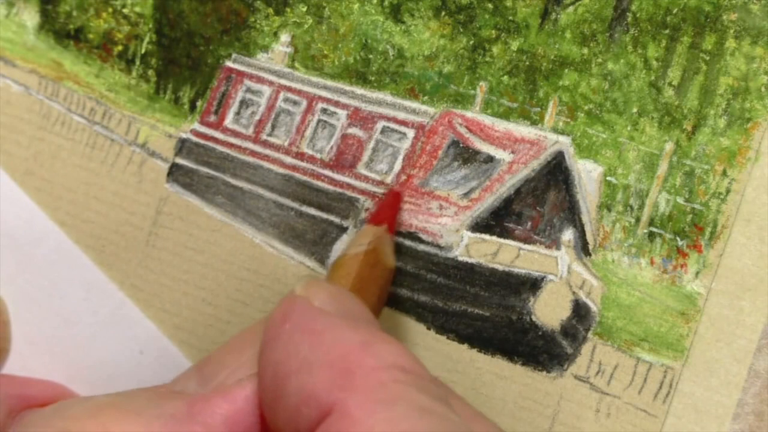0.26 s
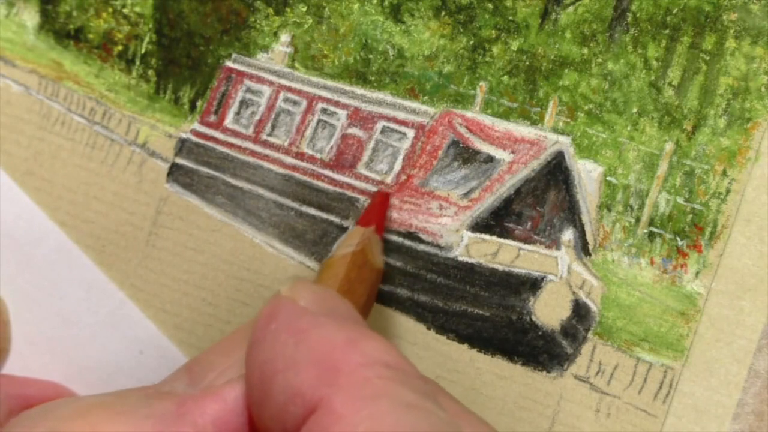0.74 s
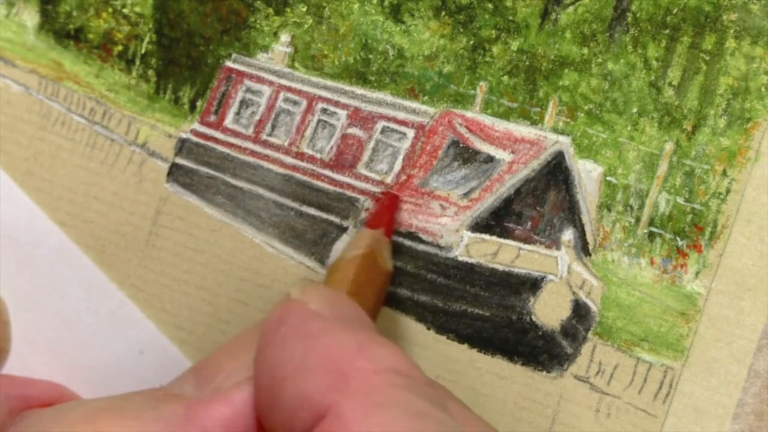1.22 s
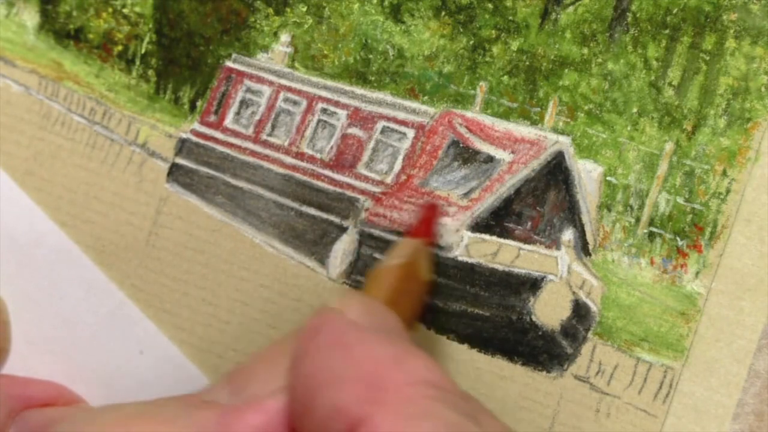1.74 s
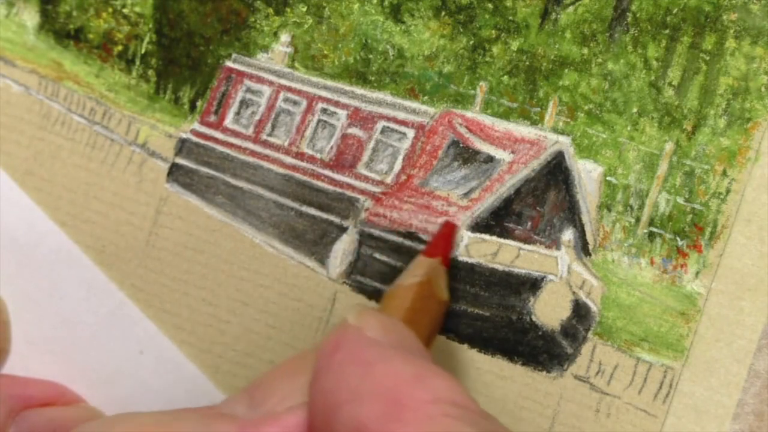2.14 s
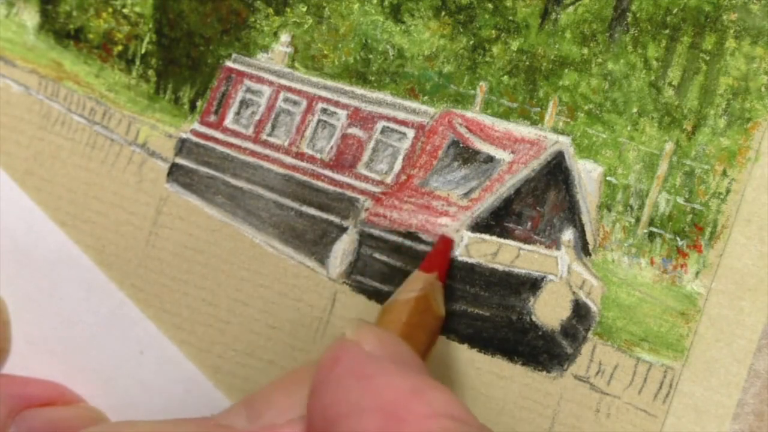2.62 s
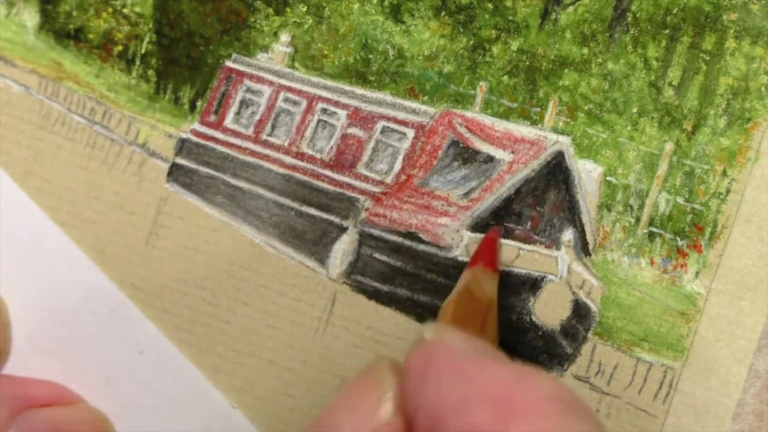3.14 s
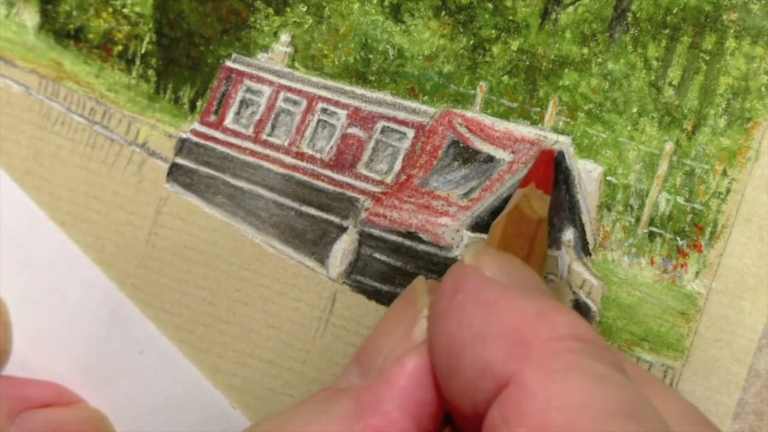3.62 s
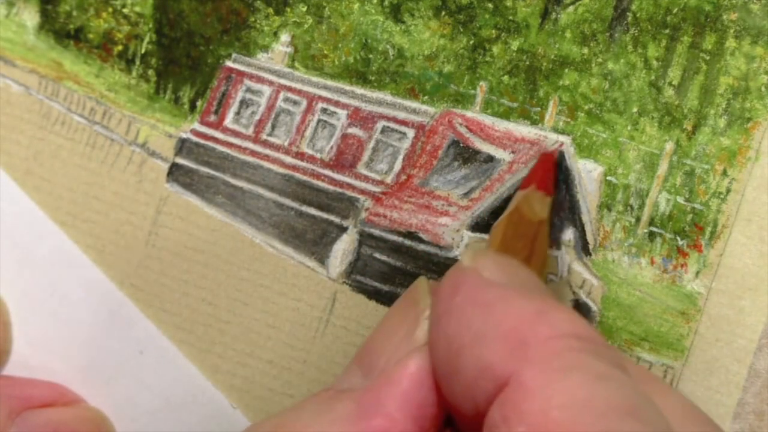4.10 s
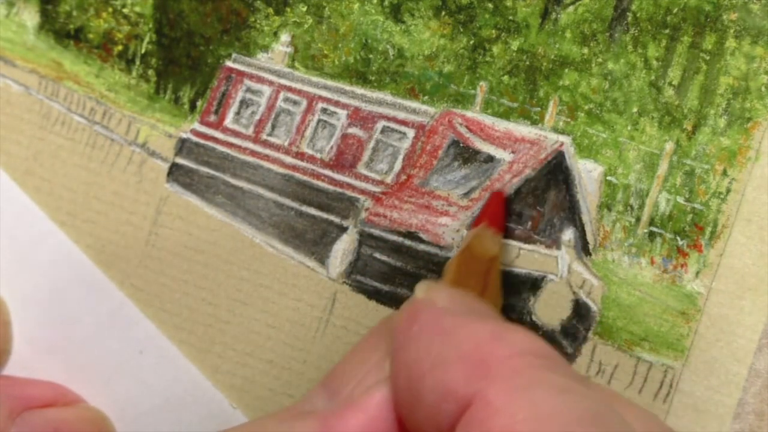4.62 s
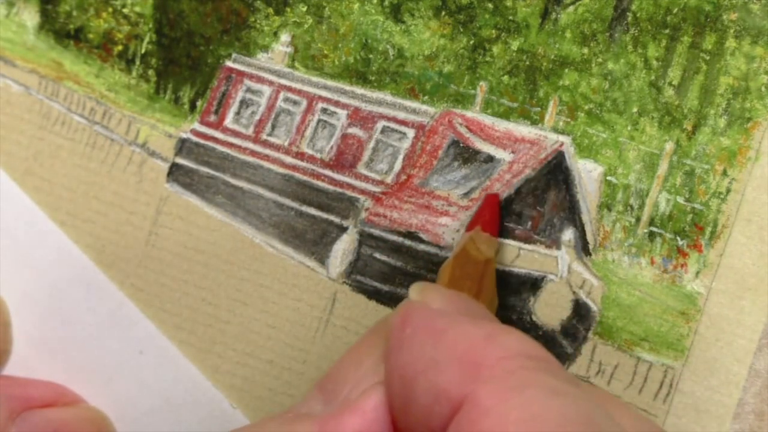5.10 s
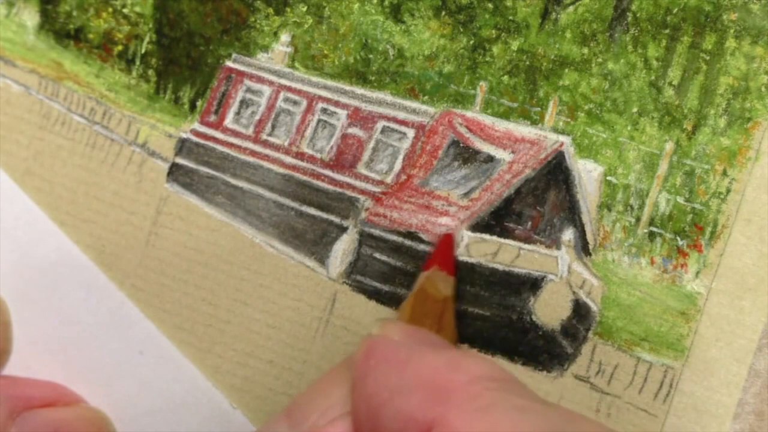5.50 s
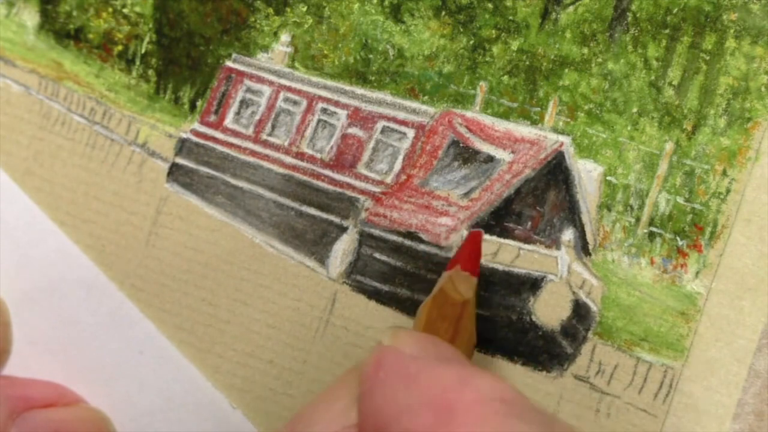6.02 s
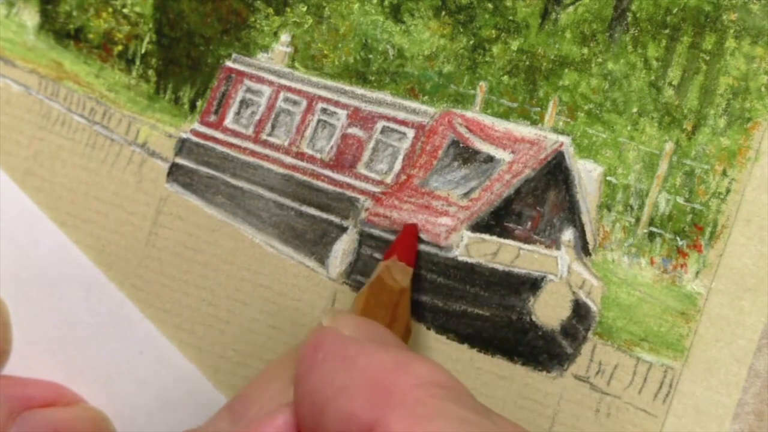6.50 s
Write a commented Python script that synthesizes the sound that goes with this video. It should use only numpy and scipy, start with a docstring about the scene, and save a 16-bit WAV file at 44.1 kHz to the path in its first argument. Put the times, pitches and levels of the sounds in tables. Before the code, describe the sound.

A coloured pencil shades textured paper on a drawing board, very close to the microphone in a quiet room. From the start until about 3 seconds it makes quick, uneven strokes, four or five a second, each a soft dry scratch with a slightly hollow tone from the board. The tip taps lightly before some of them. Around 3 seconds the strokes pause and the side of a hand slides softly over the sheet. Between 3.6 and 4 seconds the paper gives a few tiny bright ticks, the first the sharpest. Shading resumes at 4 seconds with slightly longer, slower strokes, and two firmer taps land at about 5.4 and 5.7 seconds. Another soft hand slide comes at 6 seconds, then a few faint strokes until nearly 7 seconds. A low rumble, a wavering hum and a faint hiss continue underneath throughout.

```python
"""A quiet room, the camera's two microphone ports close to a drawing board. A coloured pencil shades
toothy paper: the tip stumbles over the grain, so the board hums along in a few modes and the paper
hisses. The tip taps down before some strokes, the side of the hand slides and the sheet ticks as it
shifts. Underneath lie a low rumble, a wavering hum and the hiss of room and microphone."""
import sys
import numpy as np
from scipy import signal
from scipy.fft import rfft, irfft, next_fast_len
from scipy.io import wavfile
from scipy.ndimage import uniform_filter1d, map_coordinates

SR = 44100
rng = np.random.default_rng(int(sys.argv[2]) if len(sys.argv) > 2 else 0)


def wav_out(sig):
    """Save sig, one row per channel (or a flat mono array), as 16-bit PCM at SR to the path in sys.argv[1]."""
    wavfile.write(sys.argv[1], SR, np.round(np.clip(np.atleast_2d(sig).T, -1, 1) * 32767).astype(np.int16))


N = 297763

# The pencil, close up. Each row: start in seconds, rise in ms, length in ms, relative board level
# in dB, hiss against board in dB, tip speed from 0 to 1.
PENCIL_STROKES = [(0.012, 79, 145, -41.5, -7, 0.73), (0.331, 24, 113, -44.5, -10.5, 0.13),
                  (0.544, 36, 156, -47.5, -12.5, 0.36), (0.692, 53, 98, -53.5, -20, 0),
                  (0.799, 48, 86, -46.5, -10, 0.17), (0.877, 37, 77, -51.5, -9, 0.04),
                  (0.98, 68, 122, -45.5, -11, 0.27), (1.122, 51, 125, -40.5, -9, 0.88),
                  (1.22, 16, 124, -63, -10, 0.8), (1.384, 61, 153, -41, -7, 0.82),
                  (1.644, 55, 156, -43.5, -7, 0.5), (1.876, 68, 226, -49, -8.5, 0.52),
                  (2.153, 43, 129, -45, -8.5, 0.55), (2.364, 73, 152, -44.5, -7, 0.54),
                  (2.622, 49, 140, -49.5, -6.5, 0.44), (2.826, 72, 148, -47, -7.5, 0.46),
                  (3.982, 71, 142, -45.5, -5.5, 0.76), (4.331, 62, 150, -44, -3.5, 0.48),
                  (4.582, 98, 197, -44.5, -7.5, .5), (4.858, 133, 225, -44, -7.5, 0.46),
                  (5.142, 132, 200, -44.5, -8, 0.2), (5.428, 9.7, 205, -47.5, -9, 0.22),
                  (5.673, 46, 213, -51, -11, 0), (5.904, 20, 70, -52, -10, 0),
                  (6.268, 35, 80, -52, -12, 0.74), (6.47, 120, 160, -50, -8, 0.2),
                  (6.622, 13, 190, -64, -10, 0.6)]
# The side of the hand on the sheet. Each row: start in seconds, rise in ms, length in ms, relative board
# level in dB, hiss against board in dB, lowest mode against upper modes in dB.
HAND_SLIDES = [(2.998, 78, 415, -54, -3.5, 3.5), (3.69, 150, 360, -59.5, -16, 1),
               (6.018, 143, 280, -55, -3, -11)]
# The tip lands. Each row: start in seconds, relative level in dB.
TIP_TAPS = [(0.341, -44), (0.515, -36.5), (0.562, -44), (0.83, -39), (0.986, -37.5), (1.138, -44),
            (1.368, -43), (1.669, -38), (1.874, -41), (2.386, -38), (3.301, -39), (3.704, -43),
            (3.764, -49), (3.825, -38.5), (4.353, -47), (4.585, -43), (4.883, -35), (5.164, -38.5),
            (5.419, -28), (5.684, -31), (5.921, -40), (6.294, -43), (6.493, -42)]
# The sheet shifts. Each row: start in seconds, relative level in dB, pitch in Hz.
SHEET_TICKS = [(3.6445, -21.5, 8360), (3.8272, -32.5, 6340), (3.9018, -40.5, 7600), (3.955, -35, 7000)]
# A tick and its two echoes off the board. Each row: delay in seconds, gain in dB.
TICK_PATHS = [(.0008, 0), (.0032, -11), (.0056, -20)]
# The board's resonances. Each row: frequency in Hz, width in Hz, gain in dB.
BOARD_MODES = [(412, 87, -5), (647, 113, -1), (820, 89, 1), (1072, 45, 1.5), (1190, 70, -3.5),
               (1614, 107, 1.5), (2090, 227, -11.5), (2617, 105, -6)]

# Noise colours. Each row: frequency in Hz, relative spectral density in dB.
BOARD_FLOOR = [(150, -40), (300, -12), (1000, -14.5), (2400, -10.5), (3100, -22.5), (4500, -49),
               (8000, -70)]  # the board between its modes
PAPER_HISS = [(1500, -19), (3300, -16), (4300, -10), (5300, -10), (6650, -1), (8500, -2), (9700, 0),
              (11500, -10)]  # the paper under the tip
FINE_HISS = [(10000, -26), (11500, 3), (13000, 1), (15500, -14)]  # its fibres, at the very top
RUMBLE_SPECTRUM = [(12, -67), (22, -10), (31, 0.5), (41, -7), (49, -3.5), (58, -10), (75, -8), (90, -16),
                   (135, -18.5), (163, -23.5), (200, -24.5), (330, -34.5), (700, -120)]  # the low end of the room
SWAY_SPECTRUM = [(2, -10), (6, 0), (12, 5.5), (20, -4), (40, -68)]  # below hearing, felt as pressure
AIR_HISS = [(150, -40), (250, -12.5), (340, -2.5), (640, -8.5), (1460, -9.5), (2100, -13), (3000, -23),
            (7100, -16), (15500, -24)]  # room and microphone hiss

# Background swells. Each row: time in seconds, level in dB.
RUMBLE_SWELLS = [(0.0, -35), (0.34, -45.5), (0.6, -38), (0.71, -42.5), (3.25, -42.5), (3.68, -44),
                 (6.19, -41.5), (6.28, -47), (6.56, -40), (6.75, -43.5)]
DRONE_SWELLS = [(0.0, -73), (0.49, -52), (1.0, -77), (1.47, -53), (3.63, -64), (3.93, -55), (4.17, -66),
                (4.51, -57), (5.41, -64), (6.75, -70)]  # one tone that comes and goes
# The wavering hum. Each row: frequency in Hz, mean level in dB.
HUM_TONES = [(99, -53.5), (147, -56), (224, -73.5)]
# The room's decay. Each row: frequency in Hz, seconds to fall 60 dB.
ROOM_DECAY = [(300, 0.19), (2000, 0.13), (10000, 0.14)]
# The room's answer at the microphone. Each row: frequency in Hz, gain in dB.
ROOM_SEND = [(500, -17), (2000, -11.5), (6000, -10.5)]
# Background noise at the two ports. Each row: frequency in Hz, left-right correlation.
PORT_LIKENESS = [(60, 0.99), (130, 0.93), (290, 0.76), (640, 0.36), (1400, 0.35), (3100, 0.052),
                 (7000, 0.018)]
# Near sound at the two ports. Each row: frequency in Hz, lead of the left port in radians.
LEFT_LEAD = [(3000, 0.5), (4500, 1.7), (6900, 1.14), (7800, 1.07), (8700, 4.5), (9900, 4.5), (10500, -5.5),
             (12100, 4.5), (13400, 4), (14200, 7.5)]
# Its balance. Each row: frequency in Hz, left minus right in dB.
LEFT_BALANCE = [(200, -4), (700, 3.5), (1300, -0.5), (2400, 0.5), (15000, 1)]
# The microphone housing's dip. Each row: centre in Hz, width in Hz, gain in dB.
HOUSING_DIPS = [(4560, 425, -6.5)]

TOUCH_ARC = 1.24  # radians of a sine's rise that a contact follows; less is more pointed
TIP_LIFT_MS = 82.7  # the tip eases off over this time, or what is left of a short stroke
FINE_SLOW_DB, FINE_FAST_DB = -11, 0.5  # fine hiss against hiss, for a slow and a fast tip
MIDDLE_SLOW_DB, MIDDLE_FAST_DB = 4.5, -6  # drive of middle modes against upper, likewise
LOWEST_DB, USUAL_DB = -6, -44.5  # drive of lowest mode against upper, in a stroke of usual level
LOWEST_GROWS = 0.35  # that mode follows the stroke's level only in part
SLIDE_LIFT_MS, SLIDE_MIDDLE_DB, SLIDE_FINE_DB = 130, -4, -14  # skin lifts slowly and sounds duller
SWAY_DB, SWAY_SWING_DB, DRONE_HZ = -36.5, 3, 173.9
GAP_HZ, GAP_WIDTH_HZ, GAP_DB = 10720, 547, -17.5  # a narrow gap in all but the direct ticks
EDGE_HZ, EDGE_DB, TOP_HZ = 15600, -26, 16640  # the camera's treble shelf and upper limit


def rubbing():
    """Tip and hand drag over the tooth: mono near sound, and stereo hiss from the wide sheet."""
    gains, flutter = contact_gains(), wobble(45)
    bumps = patchy(grit(3.6) * amp(1.07 * flutter + 1.7 * wobble(160)), depth_db=1.5)
    fibres = [patchy(grit(3.3) * amp(0.89 * flutter + 1.1 * wobble(300)), depth_db=4) for _ in range(3)]
    board = filtered(gains[:3] * bumps, board_bands).sum(axis=0)
    paper = lambda f: np.array([amp(11.5 + along(PAPER_HISS, f)), amp(8 + along(FINE_HISS, f))])
    near_hiss, left, right = (filtered(gains[3:] * x, paper).sum(axis=0) for x in fibres)
    return board + near_hiss, amp(-0.5) * np.array([left, right])


def contact_gains():
    """How hard tip and hand drive five layers: lowest, middle and upper modes, hiss and fine hiss."""
    gains = np.zeros((5, N))
    for start_s, rise_ms, length_ms, board_db, hiss_db, speed in PENCIL_STROKES:
        lowest_db = LOWEST_DB + (LOWEST_GROWS - 1) * (board_db - USUAL_DB)
        middle_db = MIDDLE_SLOW_DB + speed * (MIDDLE_FAST_DB - MIDDLE_SLOW_DB)
        fine_db = hiss_db + FINE_SLOW_DB + speed * (FINE_FAST_DB - FINE_SLOW_DB)
        colour_db = np.array([lowest_db, middle_db, 0, hiss_db, fine_db])
        add_contact(gains, start_s, rise_ms, length_ms, TIP_LIFT_MS, board_db + colour_db)
    for start_s, rise_ms, length_ms, board_db, hiss_db, lowest_db in HAND_SLIDES:
        colour_db = np.array([lowest_db, SLIDE_MIDDLE_DB, 0, hiss_db, hiss_db + SLIDE_FINE_DB])
        add_contact(gains, start_s, rise_ms, length_ms, SLIDE_LIFT_MS, board_db + colour_db)
    return gains


def add_contact(gains, start_s, rise_ms, length_ms, lift_ms, layers_db):
    """One contact rises, holds and lifts; the treble comes late and leaves early."""
    start = round(start_s * SR)
    ms = np.arange(min(round(length_ms * SR / 1000), N - start)) * 1000 / SR
    lift_ms = np.clip(length_ms - rise_ms, 1, lift_ms)
    ramp = np.clip(np.minimum(ms / rise_ms, (length_ms - ms) / lift_ms), 0, 1)
    touch = np.sin(ramp * TOUCH_ARC) / np.sin(TOUCH_ARC)
    steepness = np.array([[1.5], [1.5], [1.7], [2.1], [2.5]])
    gains[:, start:start + len(ms)] += touch ** steepness * amp(layers_db)[:, None]


def grit(spread_db):
    """Dense contacts with the paper's tooth, of very uneven size."""
    return rng.standard_normal(N) * amp(spread_db * rng.standard_normal(N))


def patchy(x, depth_db):
    """Random patches of gain in time and frequency, as the tip wears and meets other fibres."""
    spectra = signal.stft(x, nperseg=256)[2]
    patches = uniform_filter1d(rng.standard_normal(spectra.shape), size=3, axis=0)
    patches = uniform_filter1d(patches, size=12, axis=1)
    return unit(signal.istft(spectra * amp(depth_db * unit(patches)), nperseg=256)[1][:N])


def board_modes(f):
    """The board's resonances, one row a mode, alternating in sign."""
    return np.array([(-1) ** k * amp(db) * resonance(f, hz, width)
                     for k, (hz, width, db) in enumerate(BOARD_MODES)])


def board_bands(f):
    """The board's answer to rubbing, in three rows: lowest, middle and upper modes."""
    modes = board_modes(f)
    upper = modes[3:].sum(axis=0) + amp(along(BOARD_FLOOR, f))
    return np.array([amp(21) * modes[0], amp(16.5) * modes[1:3].sum(axis=0), amp(15.5) * upper])


def tip_taps():
    """The landing tip gives the board a soft, blunt push: a thud and a short ring."""
    pushes, t = np.zeros(N + SR), np.arange(SR // 50) / SR
    push_s = 0.00027
    push = t / push_s * np.exp(-t / push_s)
    for start_s, db in TIP_TAPS:
        start = round((start_s + .001) * SR)
        pushes[start:start + len(t)] += amp(db) * push
    thud = lambda f: amp(14) * resonance(f, hz=600, width=350)
    return filtered(pushes[:N], lambda f: thud(f) + amp(12.5) * board_modes(f).sum(axis=0))


def sheet_ticks():
    """Short bright snaps of the sheet, each with two quick echoes off the board."""
    snaps, t = np.zeros((2, N + SR)), np.arange(SR // 50) / SR
    decay_db = -60 * t / 0.0081
    for start_s, db, hz in SHEET_TICKS:
        centre = 0.94 * np.sin(2 * np.pi * hz * t) + 0.59 * rng.standard_normal(len(t))
        snap = centre + 1.2 * rng.standard_normal((2, len(t)))
        for delay_s, path_db in TICK_PATHS:
            start = round((start_s + delay_s) * SR)
            snaps[:, start:start + len(t)] += amp(db + path_db + decay_db) * snap
    bass_cut = lambda f: 0.1 + 1 / (1 + (6800 / (f + 1)) ** 12)
    return filtered(snaps[:, :N], lambda f: bass_cut(f) / (1 + (f / 15000) ** 4))


def mic_ports(near):
    """The two ports hear the near sound at unlike levels and, in the treble, unlike phases."""
    side = np.array([[.5], [-.5]])
    lead = lambda f: np.interp(f, *np.transpose([(0, 0)] + LEFT_LEAD))
    return filtered(near, lambda f: amp(side * along(LEFT_BALANCE, f)) * np.exp(1j * side * lead(f)))


def room(near):
    """The room's answer builds up, then each frequency dies at its own speed; each port has its tail."""
    hz, t, spectra = signal.stft(rng.standard_normal((2, SR // 3)), SR, nperseg=256)
    build_up = 1 - np.exp(-(t / 0.011) ** 2)
    decay = amp(-60 * t / along(ROOM_DECAY, hz)[:, None])
    tail = signal.istft(spectra * build_up * decay, SR, nperseg=256)[1]
    delayed = np.pad(near, (round(.006 * SR), 0))
    wet = signal.fftconvolve(delayed[None], tail / np.linalg.norm(tail[0]), axes=1)[:, :N]
    return filtered(wet, lambda f: amp(along(ROOM_SEND, f)))


def room_tone():
    """Behind the pencil: slow pressure sway, rumble, wavering tones and a faint hiss."""
    t = np.arange(N) / SR
    level = lambda rows: amp(np.interp(t, *np.transpose(rows)))
    sway = amp(SWAY_DB + SWAY_SWING_DB * wobble(2.458)) * diffuse_noise(SWAY_SPECTRUM)
    rumble = level(RUMBLE_SWELLS) * diffuse_noise(RUMBLE_SPECTRUM)
    hum = sum(amp(db + 3.4 * wobble(3.295)) * np.sin(2 * np.pi * hz * t + 0.6 * wobble(4))
              for hz, db in HUM_TONES)
    drone = np.sqrt(2) * level(DRONE_SWELLS) * np.sin(2 * np.pi * DRONE_HZ * t + 1.1 * wobble(7.5))
    hiss = amp(-56.5 + 1.85 * wobble(4.85)) * diffuse_noise(AIR_HISS)
    return sway + rumble + hum + drone + hiss


def diffuse_noise(spectrum):
    """Noise of rms 1, alike at both ports in the bass and unrelated in the treble."""
    angle = lambda f: np.arccos(np.clip(along(PORT_LIKENESS, f), -1, 1)) / 2
    response = lambda f: amp(along(spectrum, f)) * [np.cos(angle(f)), np.sin(angle(f))]
    mid, side = filtered(rng.standard_normal((2, N)), response)
    return unit(np.array([mid + side, mid - side]))


def resonance(f, hz, width):
    """Causal response of one damped mode, 1 at its centre."""
    return 1j * f * width / (hz * hz - f * f + 1j * f * width)


def amp(db):
    """Gain of a level in dB."""
    return 10 ** (np.asarray(db) / 20)


def unit(x):
    """x at rms 1."""
    return x / np.sqrt(np.mean(x ** 2) + 1e-20)


def along(points, hz):
    """A curve through (Hz, value) points on a log frequency axis."""
    knots_hz, values = np.transpose(points)
    return np.interp(np.log(hz + 1), np.log(knots_hz + 1), values)


def wobble(rate):
    """A smooth random curve, rate knots a second."""
    return map_coordinates(rng.standard_normal(int(N * rate / SR) + 4), [np.arange(N) * rate / SR])


def filtered(x, response):
    """x through a complex response of frequency."""
    size = next_fast_len(N + SR // 2)
    return irfft(rfft(x, size) * response(np.fft.rfftfreq(size, 1 / SR)), size)[..., :N]


def scene():
    """Pencil and sheet close to the microphone, the room behind."""
    rub, wide_hiss = rubbing()
    near = rub + tip_taps()
    ticks = sheet_ticks()
    rest = mic_ports(near) + wide_hiss + room(near + ticks[0]) + room_tone()
    gap = lambda f: amp(GAP_DB * np.exp(-((f - GAP_HZ) / GAP_WIDTH_HZ) ** 2))
    return ticks + filtered(rest, gap)


def record(dry):
    """The microphone housing cuts a dip; the camera dulls the top and keeps nothing above its limit."""
    dips_db = lambda f: sum(db * np.exp(-((f - hz) / width) ** 2) for hz, width, db in HOUSING_DIPS)
    return filtered(dry, lambda f: amp(dips_db(f) + EDGE_DB * (f > EDGE_HZ)) * (f < TOP_HZ))


dry = scene()
out = record(dry)
wav_out(out)
```